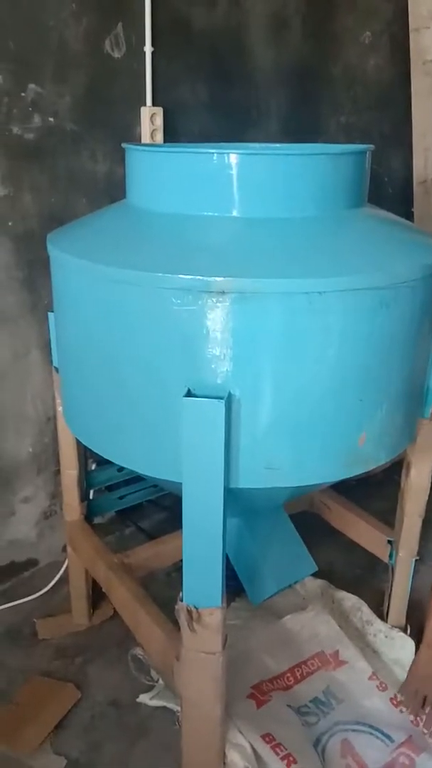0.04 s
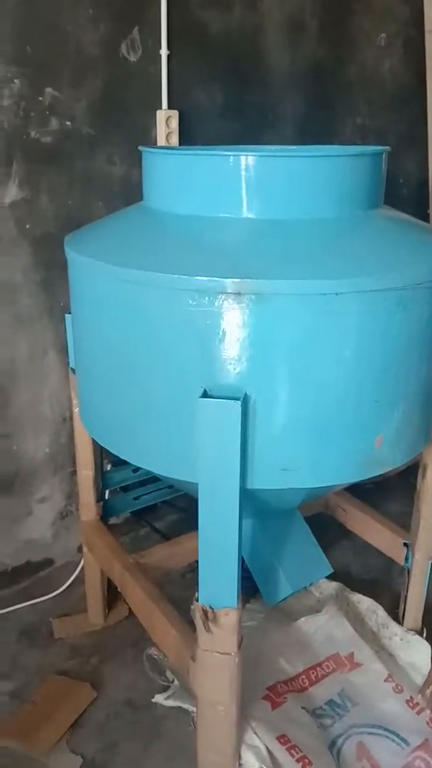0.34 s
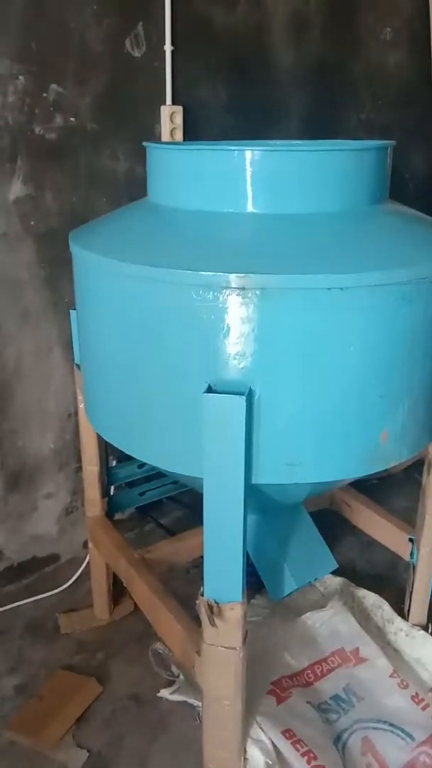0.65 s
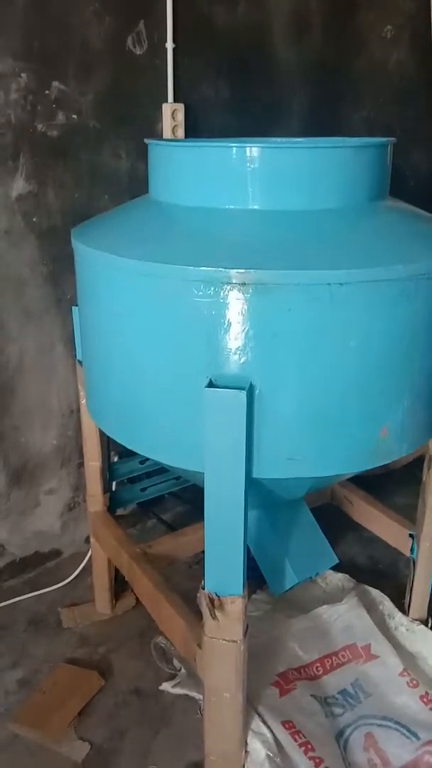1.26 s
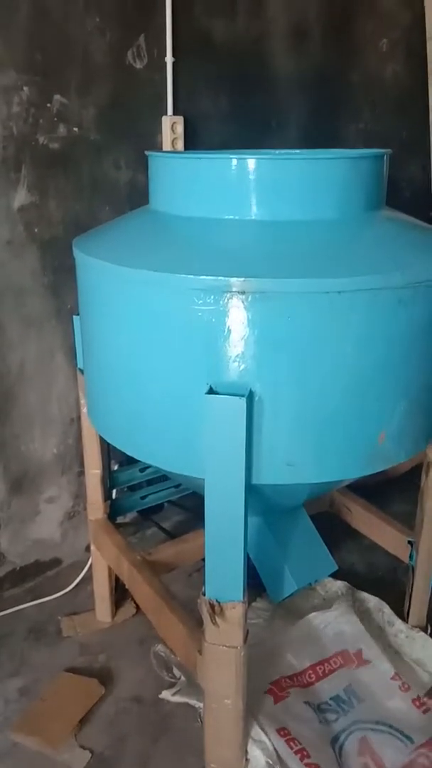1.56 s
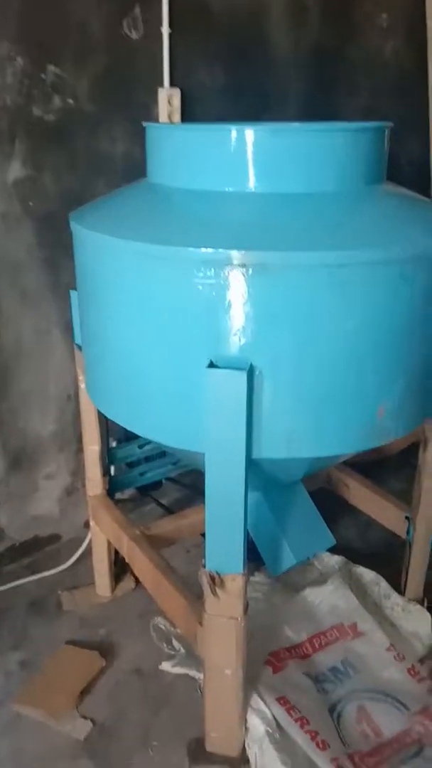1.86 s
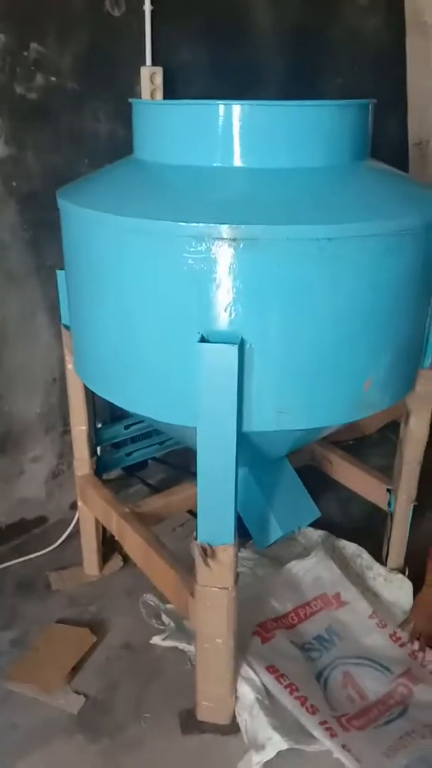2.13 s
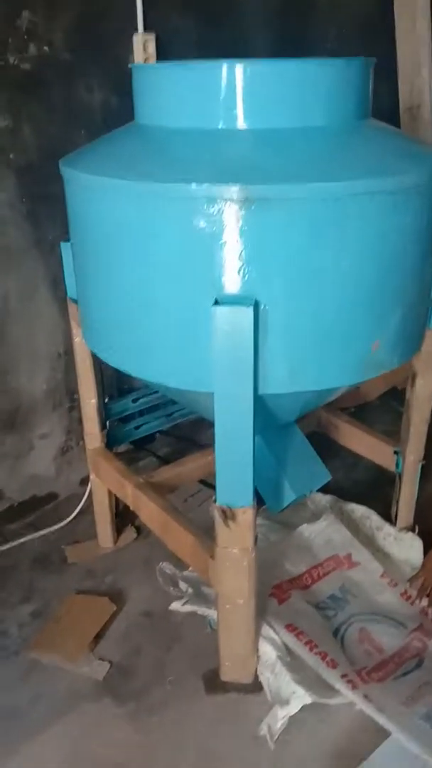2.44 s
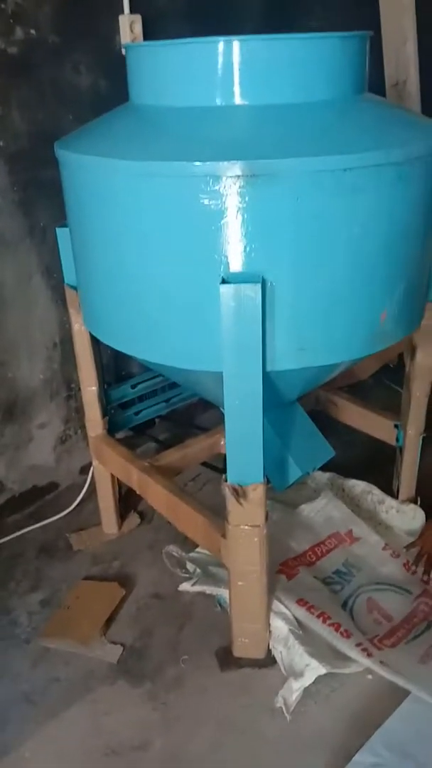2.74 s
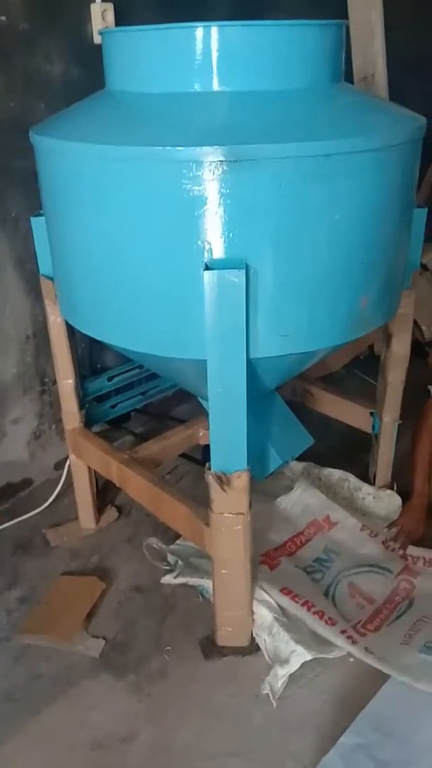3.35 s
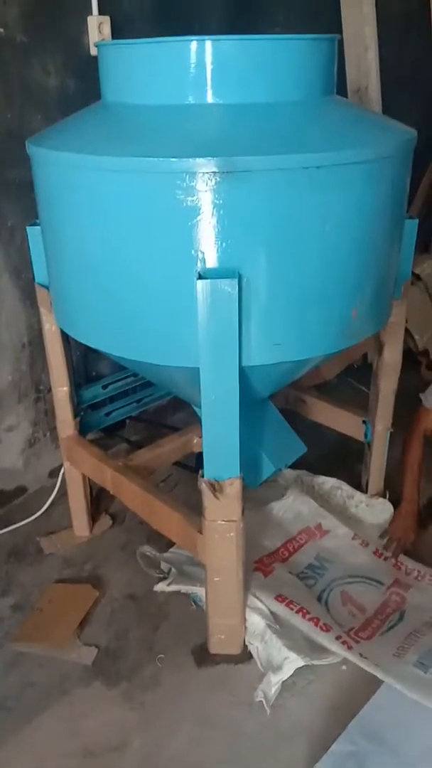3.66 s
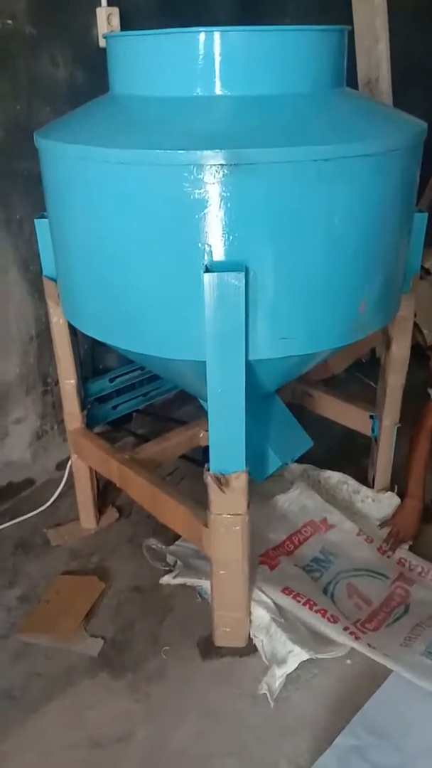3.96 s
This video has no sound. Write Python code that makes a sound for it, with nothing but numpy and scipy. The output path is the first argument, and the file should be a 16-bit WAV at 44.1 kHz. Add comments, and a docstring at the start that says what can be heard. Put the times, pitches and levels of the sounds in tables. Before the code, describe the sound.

A woven plastic sack of nuts is shaken nearby in a bare concrete room, crinkling and crunching in uneven bursts. Folds snap, nuts clack and a bumped hollow tub rings softly, while a distant engine throbs and slowly fades.

```python
"""Crinkling, crunching and sliding: a woven plastic sack of nuts is shaken in a bare concrete room.
Each pull sets off dense tiny clicks in the weave, the nuts and the shifting load. Now and then
a fold snaps, nuts clack, the load slaps or a bumped hollow tub rings; the sack scrapes the floor
once, and a short creak comes near the end. Behind it a distant engine throbs in the room's
low resonances and slowly fades, over a faint motor hum."""
import sys
import numpy as np
from scipy import signal
from scipy.fft import rfft, irfft
from scipy.io import wavfile
from scipy.ndimage import uniform_filter1d

SR = 44100
rng = np.random.default_rng(int(sys.argv[2]) if len(sys.argv) > 2 else 0)


def transcribe(signal):
    """Save signal, clipped to [-1, 1], as a 16-bit WAV file at the path in sys.argv[1]."""
    frames = np.atleast_2d(signal).T
    limited = np.clip(frames, -1, 1)
    pcm = np.round(limited * 32767).astype(np.int16)
    wavfile.write(sys.argv[1], SR, pcm)


N = 176400
T = np.arange(N) / SR


# Each row: start, rise and hold in seconds, then crinkle, crunch and slide levels in dB.
PULLS = [(-.03, 0.014, .005, -23.5, -26, -30), (0.043, 0.0046, 0.2, -30.5, -29.5, -29),
         (0.297, 0.028, 0.074, -32, -35, -34.5), (0.478, 0.073, 0.044, -36.5, -35, -36),
         (0.66, 0.029, 0.21, -43.5, -47, -41.5), (0.885, 0.0093, 0.022, -23.5, -21.5, -30.5),
         (0.934, .05, 0.023, -24, -28.5, -48), (1.086, 0.019, 0.088, -33.5, -36, -29),
         (1.187, 0.036, 0.072, -27, -28.5, -30.5), (1.386, 0.066, 0.014, -33, -32.5, -46),
         (1.485, 0.035, 0.038, -34, -53, -38.5), (1.667, 0.027, 0.15, -41.5, -39, -39),
         (1.864, 0.034, 0.01, -25, -25, -30), (2.193, 0.039, 0.076, -34.5, -42, -36.5),
         (2.276, 0.07, 0.082, -23.5, -25.5, -28), (2.478, 0.038, 0.11, -25, -28.5, -32.5),
         (2.668, .035, 0.022, -31.5, -35, -36), (2.757, 0.037, 0.26, -66, -49, -43),
         (2.953, .04, 0.02, -47, -43.5, -55), (3.07, 0.093, 0.053, -37, -43, -41),
         (3.149, 0.11, 0.014, -30.5, -29.5, -46), (3.305, 0.0031, 0.12, -25, -27.5, -34.5),
         (3.445, 0.025, 0.03, -35, -33, -36.5), (3.51, 0.11, 0.085, -34, -38.5, -43),
         (3.778, 0.0092, 0.016, -34.5, -34.5, -67), (3.917, 0.014, 0.034, -47, -40, -68)]
# Weave, nut and load spectra. Each row: frequency in Hz, relative density in dB.
CRINKLE_SPECTRUM = [(2000, -5.5), (3600, -9), (4400, -12.5), (5400, 1.5), (6300, -0.5), (7200, 0.5),
                    (8000, -6), (8900, -7), (9900, -6.5), (11200, -9), (12600, -15), (15500, -21)]
CRUNCH_SPECTRUM = [(400, -26.5), (750, -10), (1000, -10), (1500, -7), (2000, -1.5), (2400, 1), (3100, 0),
                   (3800, -6), (5000, -4.5), (9000, -76)]
SLIDE_SPECTRUM = [(50, -26), (130, 0), (185, 3), (235, 0.5), (290, 1), (345, 0.5), (450, -2), (540, -4),
                  (650, -5.5), (760, -9.5), (1100, -12), (2500, -41.5)]

def sack(top_hz=7950, neutral_db=-35.5, top_db_per_db=0.33):
    """The weave crinkles, the nuts crunch and the load slides under the same pulls."""
    crinkle = coloured(grains(per_s=4500, spread_db=4.5, clump_db=1.8, clump_s=0.005), CRINKLE_SPECTRUM)
    crunch = coloured(grains(per_s=2500, spread_db=2.5, clump_db=1.5, clump_s=0.008), CRUNCH_SPECTRUM)
    slide = coloured(grains(per_s=1500, spread_db=2, clump_db=2, clump_s=0.013), SLIDE_SPECTRUM)
    crinkle, crunch, slide = [evened(room(x, wet_db=-3.5), span_s=0.048) for x in (crinkle, crunch, slide)]
    pull = pull_gain(0, rest_db=-40.5)
    top = signal.sosfiltfilt(butter(top_hz, "high"), crinkle)
    crinkle += top * ((pull / from_db(neutral_db)) ** top_db_per_db - 1)  # hard pulls are brighter
    return crinkle * pull + crunch * pull_gain(1, rest_db=-44) + slide * pull_gain(2, rest_db=-51)


def pull_gain(layer, rest_db, release_db_per_s=122):
    """Gain of one sack layer: each pull rises, holds and dies away to the resting level."""
    power = from_db(rest_db) ** 2
    for start_s, rise_s, hold_s, *levels_db in PULLS:
        attack = np.clip((T - start_s) / rise_s, 0, 1)
        release_db = release_db_per_s * np.maximum(T - start_s - rise_s - hold_s, 0)
        power += (attack * from_db(levels_db[layer] - release_db)) ** 2
    return np.sqrt(power)


# Each row: start in seconds, relative crack and tick levels in dB.
SNAPS = [(0.0465, -27, -34), (.2089, -33, -31), (0.3225, -32, -28), (0.353, -29, -29), (0.488, -33, -30),
         (0.67, -44, -35.5), (.815, -36, -40), (0.886, -18.5, -28), (1.12, -42, -29), (1.2305, -27, -17.5),
         (1.257, -21, -24), (1.275, -19, -27), (1.3994, -28, -30), (1.4366, -23, -23), (1.466, -31, -25),
         (1.513, -35, -28), (1.677, -28, -45), (2.4977, -31, -31), (2.52, -30, -25), (2.727, -20.5, -24.5),
         (2.8923, -35, -30.5), (3.07, -33.5, -27.5), (3.1516, -40, -33), (3.306, -14.5, -27),
         (3.349, -18, -21), (3.6468, -23.5, -38), (3.7752, -17.5, -28)]
# Each row: frequency in Hz, relative density in dB.
CRACK_SPECTRUM = [(1500, -31), (2300, -10), (3200, 6.5), (4300, -8.5), (5500, 2), (7200, 0.5), (8400, -9),
                  (12000, -20)]
TICK_SPECTRUM = [(5000, -39), (8000, -1), (9800, 7), (11000, 0.5), (12500, -6.5), (15500, -7)]

def fold_snaps(decay_s=0.003):
    """A fold of the sack snaps with a crack and a higher tick."""
    cracks = coloured(bursts([(s, db) for s, db, _ in SNAPS], decay_s), CRACK_SPECTRUM)
    ticks = coloured(bursts([(s, db) for s, _, db in SNAPS], decay_s), TICK_SPECTRUM)
    return room(cracks, wet_db=3.5) + room(ticks, wet_db=-0.5)


# Each row: peak time in seconds, relative level in dB.
CLACKS = [(.0455, -18.5), (.898, -21.5), (1.4366, -25), (1.6765, -27), (2.765, -37), (3.407, -26),
          (3.7755, -28)]
SLAPS = [(.06, -26), (.903, -35.5), (1.897, -24), (1.92, -32)]
# Each row: frequency in Hz, relative density in dB.
CLACK_SPECTRUM = [(500, 0), (800, 1), (1030, 4), (1400, -3), (1900, -7), (2200, 8), (2550, 3), (2900, -0.5),
                  (5000, -14), (12000, -17)]
SLAP_SPECTRUM = [(150, -19), (280, 4.5), (450, -15), (650, 0.5), (850, -0.5), (1050, -5), (1250, 1),
                 (1600, -7), (2200, -1), (3200, -24), (5000, -3.5), (10000, -35)]

def nut_knocks():
    """Nuts clack together; the dropping load slaps the sack with a softer onset."""
    clacks = coloured(bursts(CLACKS, decay_s=0.0069), CLACK_SPECTRUM)
    slaps = coloured(bursts(SLAPS, decay_s=0.016, rise_s=0.022), SLAP_SPECTRUM)
    return room(clacks + slaps, wet_db=0)


# Each row: start in seconds, relative level in dB, pitch favoured by the contact point in Hz.
BUMPS = [(0.0, -22.5, 700), (.044, -14.5, 422), (1.101, -27.5, 430), (2.242, -28, 680), (2.395, -26, 690),
         (2.586, -28.5, 600)]
# Each row: frequency in Hz, relative level in dB, T60 in seconds.
TUB_MODES = [(299, -13.5, 1), (340, -2, 0.5), (396, -1, 0.56), (429, -4.5, 0.51), (495, -8.5, 0.72),
             (552, -3, 0.47), (648, -3.5, 0.26), (876, -11, 0.64), (930, -17, 0.26), (1210, -9, 0.4)]

def tub(falloff_db_per_octave=11):
    """Each bump rings the hollow tub's modes, less so away from its favoured pitch."""
    out = 0
    for start_s, level_db, favoured_hz in BUMPS:
        blow = from_db(level_db) * (np.arange(N) == int(start_s * SR))
        modes = [(hz, db - falloff_db_per_octave * abs(np.log2(hz / favoured_hz)), t60_s)
                 for hz, db, t60_s in TUB_MODES]
        out += ring(blow, modes)
    return signal.sosfilt(butter([240, 1800], "band"), out)


# Each row: start in seconds, length in seconds, level in dB.
SCRAPES = [(3.158, 0.14, -32)]
# Each row: frequency in Hz, relative density in dB.
SCRAPE_SPECTRUM = [(900, -26), (1500, -13), (1950, 0), (2300, 0), (2800, -6), (3600, -15), (7000, -28)]

def floor_scrape():
    """Stick-slip grains swell and stop as the sack is dragged."""
    gain = 0
    for start_s, length_s, db in SCRAPES:
        progress = np.clip((T - start_s) / length_s, 0, 1)
        gain += from_db(db) * np.sqrt(np.abs(np.sin(np.pi * progress)))
    slips = coloured(grains(per_s=1800, spread_db=3, clump_db=2, clump_s=0.008), SCRAPE_SPECTRUM)
    return room(gain * rms_one(slips), wet_db=-5)


def creak(start_s=3.777, start_hz=1140, fall_hz_per_s=3030, fade_s=0.079, level_db=-37.5):
    """A rough tone sinks and fades after the last snap."""
    age_s = np.maximum(T - start_s, 0)
    pitch_hz = start_hz - fall_hz_per_s * np.minimum(age_s, 2 * fade_s)
    tone = np.sin(2 * np.pi * np.cumsum(pitch_hz) / SR)
    roughness = evened(signal.sosfilt(butter(70, "low"), rng.standard_normal(N)), span_s=0.04)
    gain = from_db(level_db) * (age_s > 0) * np.exp(-(age_s / fade_s) ** 2)
    return room(gain * roughness * tone, wet_db=-5)


# Each row: time in seconds, levels in the lower and upper room modes in dB.
ENGINE_LEVELS = [(0.0, -30, -26.5), (0.27, -36.5, -24), (0.48, -27.5, -34), (0.54, -44, -40),
                 (0.6, -32.5, -28.5), (1.45, -33.5, -30), (1.78, -29, -33), (1.9, -48, -34),
                 (1.98, -29, -31), (2.17, -33, -32), (2.86, -35.5, -40), (2.91, -53, -51),
                 (3.14, -31, -42.5), (3.4, -45, -34), (3.45, -28.5, -39.5), (3.83, -42, -38.5),
                 (3.9, -32, -46), (4.0, -37, -41)]
# Each row: frequency in Hz, relative level in dB, T60 in seconds.
LOWER_ROOM_MODES = [(93.4, 30, 0.39), (111, 23, 0.96)]
UPPER_ROOM_MODES = [(136.64, -4.5, 0.4), (153.9, -13, 0.42), (177.5, -18, 0.75)]
# Each row: frequency in Hz, relative density in dB.
RUMBLE_SPECTRUM = [(20, -26), (35, -15), (48, -12), (58, -13), (72, 5), (120, 1), (200, -0.5),
                   (300, -14), (1000, -31)]

def engine(firings_per_s=14.9, jitter_s=0.0022, spread_db=1.5, exhaust_db=-30, rumble_db=-47):
    """Uneven firings and exhaust noise ring the low room modes, over a broad rumble."""
    times_s, lower_db, upper_db = np.transpose(ENGINE_LEVELS)
    lateness, weakness = rng.standard_normal((100, 2)).T
    firing_at = (np.abs(np.arange(100) / firings_per_s + jitter_s * lateness) * SR).astype(int)
    drive = from_db(exhaust_db) * rng.standard_normal(N + SR)  # 1 s lead-in: already running
    inside = firing_at < len(drive)
    drive[firing_at[inside]] += from_db(-spread_db * weakness[inside])
    throb = 0
    for modes, levels_db, band_hz in ((LOWER_ROOM_MODES, lower_db, [88, 130]),
                                      (UPPER_ROOM_MODES, upper_db, [115, 180])):
        boom = signal.sosfilt(butter(band_hz, "band"), ring(drive, modes))
        throb += evened(boom, span_s=0.13)[SR:] * from_db(np.interp(T, times_s, levels_db))
    swing_db = 0.81 * np.interp(T, times_s, upper_db - upper_db.mean())
    rumble = rms_one(coloured(rng.standard_normal(N), RUMBLE_SPECTRUM))
    return throb + from_db(rumble_db + swing_db) * rumble


# Each row: frequency in Hz, rms level in dB.
HUM_LINES = [(48.4, -72), (96.8, -46.5), (193.6, -51.5)]

def motor_hum():
    """Steady harmonics of a motor."""
    return sum(from_db(db) * np.sqrt(2) * np.sin(2 * np.pi * (hz * T + rng.random()))
               for hz, db in HUM_LINES)


def grains(per_s, spread_db, clump_db, clump_s):
    """Random clicks of uneven size, swelling in clumps."""
    sizes = from_db(spread_db * np.minimum(rng.exponential(1, N), 5)) * rng.choice([-1, 1], N)
    clumps = np.interp(T / clump_s, np.arange(N), rng.standard_normal(N))
    return sizes * (rng.random(N) < per_s / SR) * from_db(clump_db * clumps)


def bursts(events, decay_s, rise_s=1 / SR):
    """One decaying noise burst per event."""
    gain = 0
    for peak_s, db in events:
        attack = np.clip(1 + (T - peak_s) / rise_s, 0, 1)
        gain += from_db(db) * attack * np.exp(-np.maximum(T - peak_s, 0) / decay_s)
    return gain * rng.standard_normal(N)


def ring(x, modes):
    """Decaying modes driven by x, neighbours in opposite sign."""
    out = 0
    for k, (hz, db, t60_s) in enumerate(modes):
        radius, angle = np.exp(-np.log(1000) / (t60_s * SR)), 2 * np.pi * hz / SR
        mode = signal.lfilter([0, np.sin(angle)], [1, -2 * radius * np.cos(angle), radius ** 2], x + 1e-18)
        out += (-1) ** k * from_db(db) * mode
    return out


def room(x, wet_db, t60_s=0.66):
    """Direct sound plus a dense tail off bare walls, at unchanged power."""
    t = T[:SR]
    tail = rng.standard_normal(SR) * np.exp(-np.log(1000) * t / t60_s) * (t > 0.004)
    reverb = signal.fftconvolve(x, tail / np.linalg.norm(tail))[:N]
    wet = from_db(wet_db)
    return (x + wet * reverb) / np.hypot(1, wet)


def coloured(x, spectrum, taps=2048):
    """Minimum-phase filter of unit energy with the given spectrum."""
    hz, db = np.transpose(spectrum)
    shape_db = np.interp(np.log(np.linspace(1, SR / 2, taps + 1)), np.log(hz), db)
    cepstrum = irfft(np.log(from_db(shape_db)))
    response = irfft(np.exp(rfft(2 * cepstrum[:taps], 2 * taps)))[:taps]
    return signal.fftconvolve(x, response / np.linalg.norm(response))[:N]


def evened(x, span_s):
    """Hold the running rms at 1, keeping faster detail."""
    return x / np.sqrt(np.maximum(uniform_filter1d(x ** 2, int(span_s * SR)), 1e-12))


def butter(hz, kind):
    """Order-2 filter sections."""
    return signal.butter(2, hz, kind, fs=SR, output="sos")


def rms_one(x):
    """Scale to rms 1."""
    return x / np.sqrt(np.mean(x ** 2) + 1e-20)


def from_db(db):
    """Decibels to gain."""
    return 10 ** (np.asarray(db) / 20)


def scene():
    """All sources summed, the same on both channels."""
    handling = sack() + floor_scrape() + from_db(5) * (fold_snaps() + nut_knocks()) + tub() + creak()
    return np.tile(handling + engine() + motor_hum(), (2, 1))


def record(dry, peak_limit=0.57, cutoff_hz=15600):
    """Soft clip, then a steep low-pass."""
    rounded = peak_limit * np.tanh(dry / peak_limit)
    return signal.sosfilt(signal.ellip(12, 0.1, 90, cutoff_hz, fs=SR, output="sos"), rounded)


dry = scene()
out = record(dry)
transcribe(out)
```